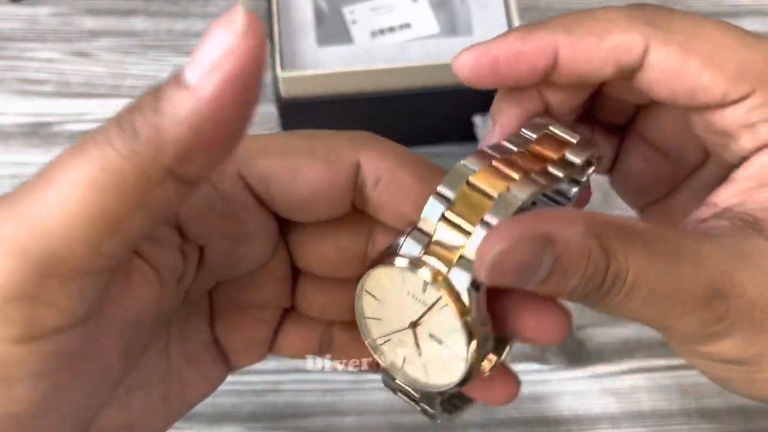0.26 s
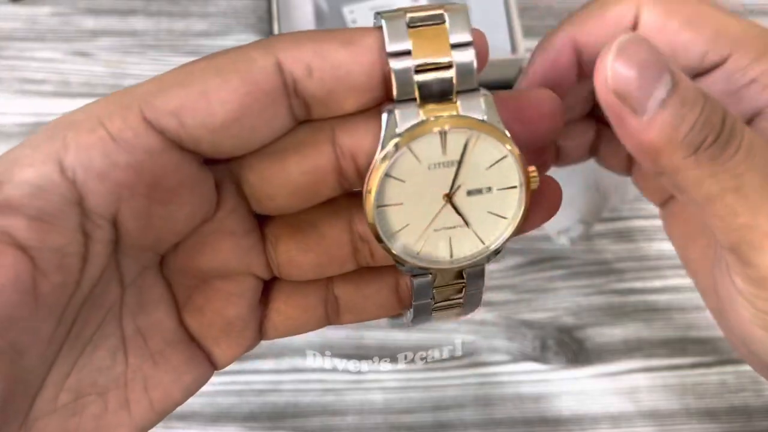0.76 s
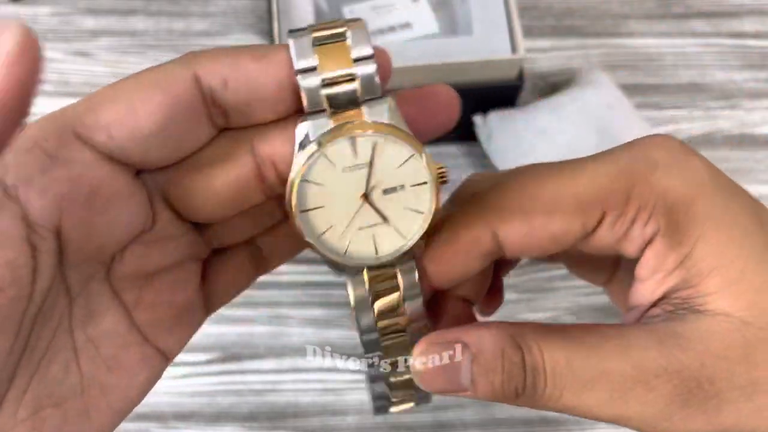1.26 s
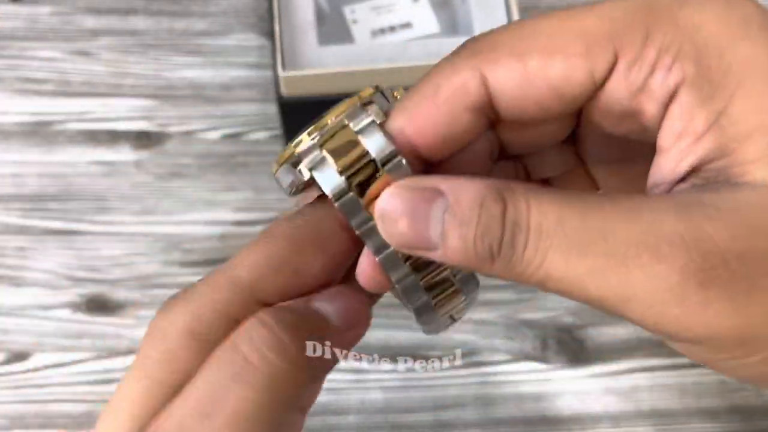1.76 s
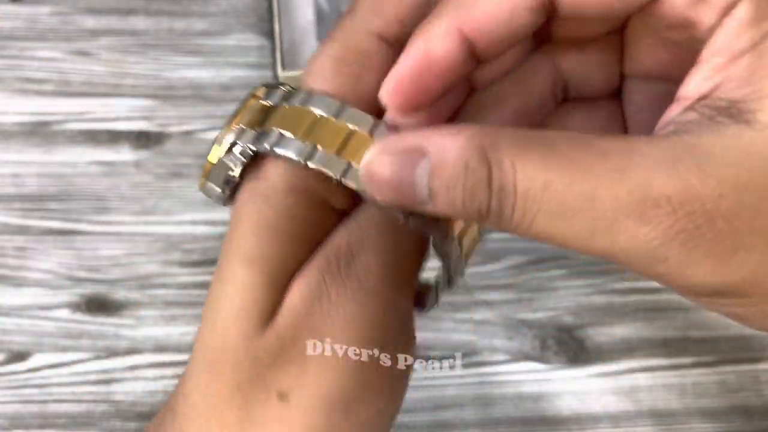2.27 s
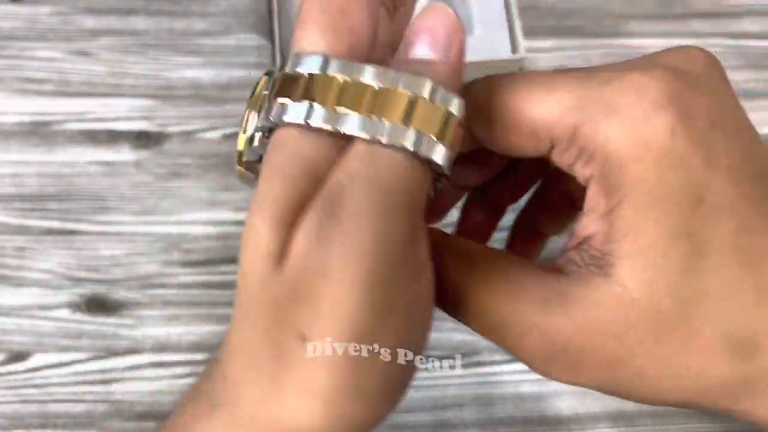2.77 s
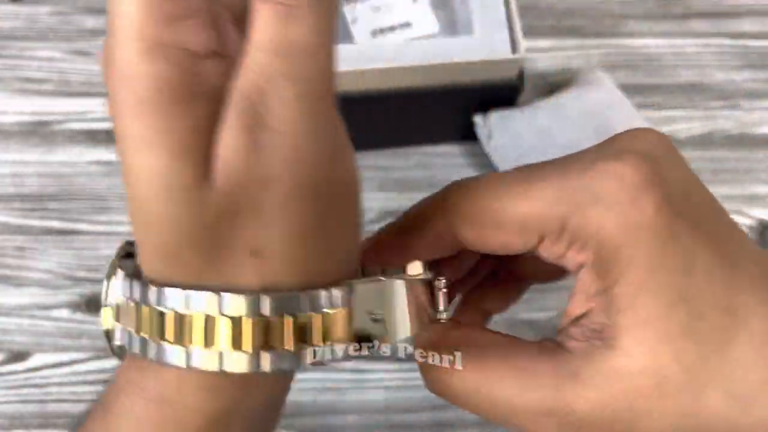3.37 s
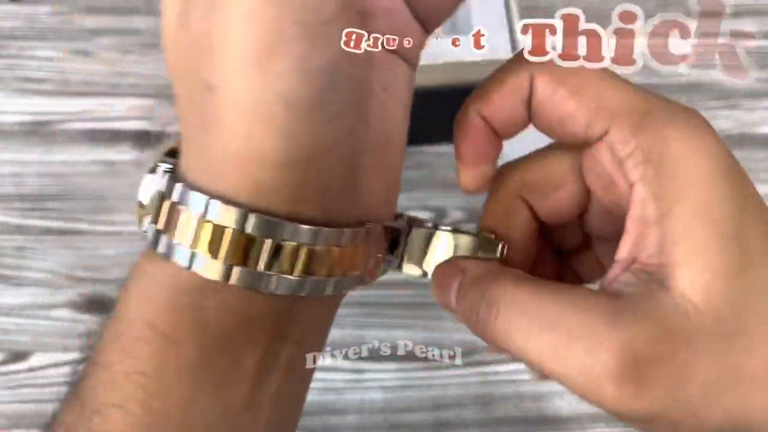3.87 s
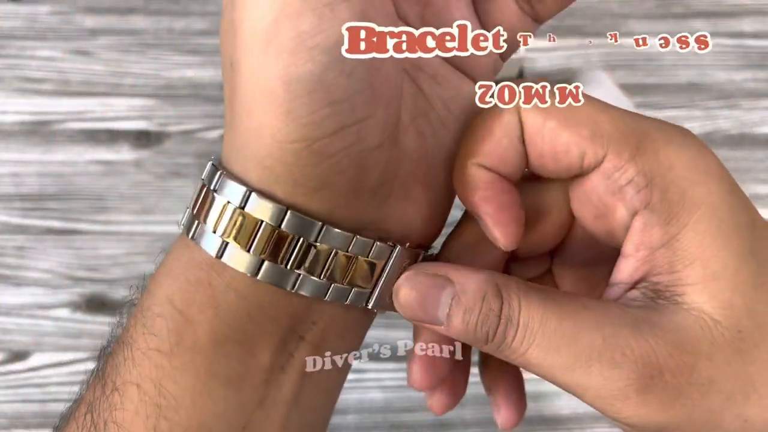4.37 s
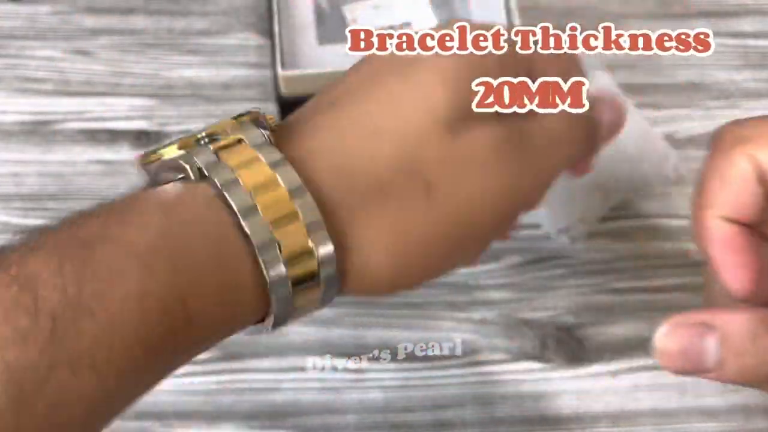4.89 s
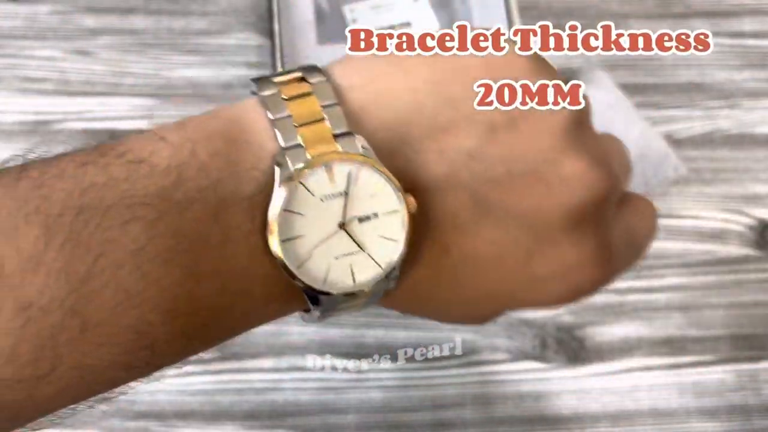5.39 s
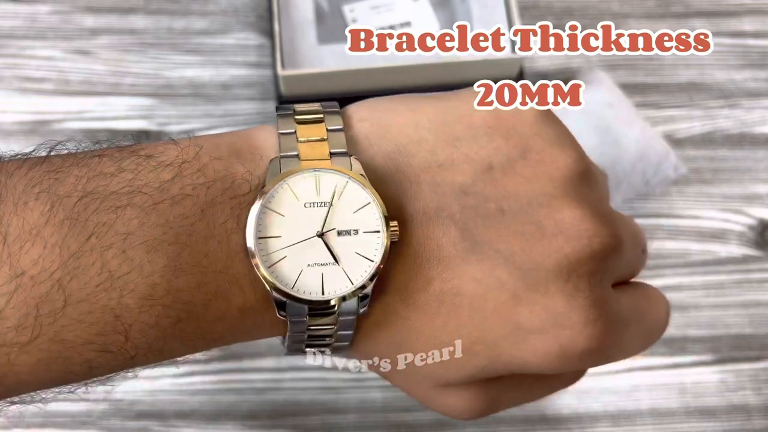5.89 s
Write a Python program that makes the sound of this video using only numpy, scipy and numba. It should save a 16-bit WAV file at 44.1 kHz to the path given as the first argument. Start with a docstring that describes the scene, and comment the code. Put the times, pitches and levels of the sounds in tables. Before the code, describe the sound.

Metal watch bracelet links clink and rattle up close as it is slipped over a hand, then the clasp snaps shut over a low indoor hum.

```python
"""Indoors, close on a phone's two microphone ports: a steel watch bracelet, over hum, rumble, hiss and a fan's whirr.
From the start its links clack and chatter as it is turned and slipped over a hand: tiny blows ring steel modes.
Around 1 to 1.5 s the moving hand puffs air on the ports, as decaying tones; skin and cloth brush, as low noise.
From 3.4 s the clasp plates tick, and at 4.05 and 4.42 s the clasp snaps hard: single blows on the same modes.
At 5.5 s something dull falls further off, as fading noise. Gain dips around the loudest peaks and creeps back."""
import sys
import numpy as np
from scipy import signal
from scipy.fft import rfft, irfft, next_fast_len
from scipy.io import wavfile
from scipy.ndimage import uniform_filter1d, minimum_filter1d
from numba import njit

SR = 44100
rng = np.random.default_rng(int(sys.argv[2]) if len(sys.argv) > 2 else 0)


def digitize_waveform(pressure):
    """Quantize a signal to 16-bit integers and store it at the path in sys.argv[1].

    Rows of a 2-D input are taken as channels; values are limited to [-1, 1].
    """
    field = np.atleast_2d(pressure).T
    bounded = np.clip(field, -1, 1)
    quanta = np.round(bounded * 32767).astype(np.int16)
    wavfile.write(sys.argv[1], SR, quanta)


N = 270774

# Room air, rumble to hiss: f/Hz, relative level/dB (per Hz)
AIR_SPECTRUM = [(18, -22), (28, -17.5), (52, 7), (75, -0.5), (100, -6), (150, -9), (210, -19), (330, -30.5),
                (500, -38), (900, -42.5), (1700, -47), (3000, -49), (8000, -54.5), (14000, -67)]
# Fan whirr: f/Hz, width of each filter pass/Hz, level/dB, left minus right/dB
WHIRR_BANDS = [(1235, 357, -67.5, 20.5), (2190, 480, -68.5, 20)]
# Skin and cloth brushing, a soft low rustle: start t/s, end t/s, relative level/dB
BRUSHES = [(0, 0.27, -59.5), (1.3, 1.33, -54), (3.2, 3.42, -52.5), (3.498, 3.925, -55)]
# Distant fall and its rebounds: t/s, relative level/dB, scuff against body/dB, fade to 1/e/ms
LANDINGS = [(5.535, -35, -17, 89), (5.572, -39.5, -7.5, 31), (5.593, -17, -35.5, 80),
            (5.62, -20.5, -36.5, 17), (5.69, -30.5, -47, 24), (5.72, -40, -14, 38), (5.809, -43, -44, 37)]
# Dull body of the fallen thing: f/Hz, width of each filter pass/Hz, relative level/dB
FALL_RESONANCES = [(219, 38, 0.5), (260.6, 36, -4), (352.6, 32, 0), (509, 87, -10.5), (610, 60, -15.5),
                   (713, 110, -15), (937.1, 250, -21), (1327.4, 880, -26)]
# Puffs of air from the moving hand on the ports: t/s, f/Hz, relative level/dB, 60 dB decay time/ms,
# left port lead/rad
AIR_PUFFS = [(1.024, 1120, -33, 35.84, 0.935), (1.375, 270, -12.5, 22, 2), (1.38, 105, -1, 38, 2),
             (1.428, 180, -18, 95, 1.95), (1.444, 71.4, -7, 190, 1.66), (1.48, 96.7, -11.5, 160, 0.99),
             (1.506, 109, -12.5, 170, 1.3)]
# What links and clasp ring with: f/Hz, relative level/dB, 60 dB ring time/ms
STEEL_MODES = [(1000, -4, 14), (1510, -1, 3.5), (1900, 3, 10), (2466, 3, 5.2), (3270, -4.5, 25),
               (3836, 9.5, 6.5), (4410, 7, 6.9), (4855, -8, 12), (5163, -12.5, 6.3), (5530, -5, 6.3),
               (6386, -5.5, 5.6), (6910, -8, 4), (7520, -11, 10), (8080, -2, 2.2), (8370, -5, 8.3),
               (8920, -6.5, 15), (9100, -9, 2.2), (9220, -2, 5.8), (9900, -0.5, 3), (10580, 5.5, 5.7),
               (11580, 10.5, 4.1), (12600, 5, 6), (12120, 3.5, 4), (13150, 11, 4.7), (14300, -4, 4.5),
               (14860, 4, 5.2), (14800, 7.5, 6.8), (15230, -18.5, 3)]
# Shakes that set the links rattling: strongest t/s, relative level/dB, 20 dB swell/ms, 20 dB fade/ms,
# low modes/dB
BRACELET_SHAKES = [(0.09, -49.5, 64, 60, -9), (0.2, -53.5, 47, 61, -17), (0.455, -34.5, 33, 62, -15.5),
                   (0.53, -40.5, 45, 65, -16), (0.95, -45.5, 16, 30, -16), (1.13, -58.5, 290, 30, -13),
                   (1.3, -37.5, 81, 110, -11), (1.47, -50.5, 83, 77, -13.5), (1.62, -52.5, 90, 270, -10.5),
                   (1.68, -44.5, 140, 26, -13), (2.15, -39.5, 79, 157, -13), (2.44, -42, 103, 66, -13),
                   (2.81, -51.5, 15, 330, -11.5), (2.87, -36.5, 35, 95, -16.5),
                   (3.19, -51, 180, 100, -15.5), (3.28, -49.5, 150, 89, -19), (3.44, -56, 14, 45, -15),
                   (3.55, -57, 77.8, 210, -19), (3.7, -63, 200, 45, -2.5), (3.92, -52, 130, 45, -16),
                   (3.98, -52.5, 61, 15, -12), (4.05, -50, 94, 87, -9), (4.1, -55, 39, 30, -10),
                   (4.425, -38.5, 9.5, 220, -20.5), (4.75, -51, 31, 61, -21.5), (4.96, -45.5, 26, 50, -31),
                   (5.07, -51, 50, 220, -22)]
# Links knocking: t/s, relative level/dB, low modes/dB, high modes/dB
LINK_CLACKS = [(0.052, -37, -8, -10), (0.0747, -27.5, -25, -26), (0.162, -38.5, -10, -25),
               (0.1754, -33.5, -15, -12), (0.186, -28.5, -20, 1.5), (0.2169, -34, -27, -8),
               (0.2886, -35, -13, -2.5), (0.3406, -51, -16, -6), (0.3625, -51, -14, -3),
               (0.4253, -34, -24, 0), (0.447, -36, -26, 1), (0.4598, -20.5, -35, -3.5),
               (0.4765, -29, -16, -5), (0.5212, -21.5, -20, 0), (0.5594, -43, -11, 4),
               (0.672, -42, -25, -0.5), (0.9452, -40, -27, -3), (1.0164, -42, -28, -13),
               (1.0945, -21, -30, -23), (1.1338, -30, -20, -5), (1.2256, -34, -13, -21),
               (1.2674, -23.5, -26, -32), (1.285, -22.5, -29, -7), (1.3059, -10, -19.5, -11),
               (1.3205, -27, -14, 0.5), (1.3553, -27, -26, -8), (1.462, -32, -32, 0.5),
               (1.509, -37, -19, -25), (1.5189, -30, -36, -40), (1.5818, -33, -22, -31),
               (1.5948, -31, -23, -31), (1.6049, -18, -38, -20), (1.6164, -24.5, -16, -9),
               (1.6357, -22.5, -25, -7), (1.648, -29, -25, -9), (1.667, -29.5, -27, -8.5),
               (1.6758, -28, -22, -8), (1.926, -38, -26, -9), (2.1047, -38, -27, -6),
               (2.12, -17.5, -19, -24), (2.1259, -13, -21.5, -14), (2.137, -21.5, -14, -13),
               (2.165, -19.5, -18.5, -7.5), (2.236, -29, -24, -19), (2.2825, -33.5, -21, -14),
               (2.3458, -28, -22, -13), (2.368, -29, -21, -8), (2.388, -25.5, -39, -6),
               (2.4208, -24, -33, -13), (2.4265, -23, -22, -5.5), (2.4375, -14, -21.5, -4.5),
               (2.616, -43.5, -43, -7), (2.794, -32.5, -36, -20), (2.8409, -24, -43, -24),
               (2.8693, -17.5, -43, -5), (2.8994, -29, -25, -16), (3.0917, -30.5, -23, -29),
               (3.1738, -22.5, -31, -18), (3.1823, -26, -36, -10), (3.216, -30.5, -37, -21),
               (3.261, -34, -18, -15), (3.271, -31, -29, -10), (3.3386, -35.5, -18, -9),
               (4.0338, -29, -42, -17), (4.2667, -45, -27, -25), (4.6045, -27.5, -26.5, -15),
               (4.6584, -31.5, -37, -7), (4.6671, -27, -32, -4.5), (4.7474, -47, -17, -5),
               (4.93, -39.5, -33.5, -21), (4.9566, -26.5, -46, -15), (5.0003, -32.5, -35, -11),
               (5.0645, -38.5, -40, -5), (5.0994, -50, -26, -22), (5.1315, -35.5, -28, -21)]
# Clasp plates ticking as they are folded: t/s, relative level/dB, low modes/dB, high modes/dB
CLASP_TICKS = [(3.4364, -38, -25, -14), (3.5302, -32, -19, -6), (3.6573, -31.5, -23, -10),
               (3.696, -20, -25, -3.5), (3.7823, -28.5, -30, -7), (3.8291, -34, -20, -7.5),
               (3.9088, -37, -20, -2.5), (3.9709, -20.5, -20.5, -10), (4.0213, -37, -19.5, -10),
               (4.1063, -26, -26, -7)]
# Clasp snapping shut: t/s, relative level/dB, low modes/dB, high modes/dB
CLASP_SNAPS = [(4.0473, -16.5, -25, -3.5), (4.049, -15.5, -30, -1.5), (4.0744, -6, -31, -8),
               (4.0747, -18, -37.5, -2), (4.42, -2, -22.5, -10)]
# Room echo by band: f/Hz, width of each filter pass/Hz, 60 dB decay time/s, relative level/dB
ECHO_BANDS = [(5240, 5800, 0.36, -15), (12800, 9700, 0.16, -28)]

AIR_DB, AIR_ALIKE_HZ = -35, 302  # below about this pitch the ports hear the same air
BRUSH_SWELL_S, BRUSH_FADE_S = 0.07, 0.21  # time to change 20 dB
HUM_HZ, HUM_DB = 100.2, -30.5
HUM_LEFT_DB, HUM_LEFT_RAD = -4, -0.16  # left against right
FALL_SCUFF_HZ = 2740
LOW_BELOW_HZ, HIGH_ABOVE_HZ = 4550, 9300  # borders of the low and high steel modes
LOW_MODES_LEFT_DB, HIGH_MODES_LEFT_DB = 6.5, -3.5  # left minus right, added to each blow's own lean
LOW_LEFT_LAG_MS, LEFT_LAG_MS, LEFT_RAD = -0.14, 0.25, -1.3  # left port against right
RATTLE_PER_S, RATTLE_HIGH_DB = 1600, -12.5
CLACK_CHATTER_MS, TICK_CHATTER_MS = 1.7, 0.68  # time scale of the contacts in one knock
KNOCK_LEFT_DB, KNOCK_LEFT_SCATTER_DB = 3, 4.5
SPOT_DB = 3.5  # scatter of mode levels with the place struck
ECHO_BUILD_S = 0.022
LIMIT_DB, QUICK_S, SLOW_S = 1.5, 0.014, 0.33  # ceiling re full scale, envelope falls to 1/e
SLOW_SHARE = 0.93  # share of the cut, in dB, that creeps back slowly
TOP_HZ = 16300


def undb(db):
    """Amplitude factor of a level in dB."""
    return 10 ** (np.asarray(db) / 20)


def level(x, db):
    """Scale to an rms level in dB."""
    return x * undb(db) / np.sqrt(np.mean(x ** 2))


def ring(x, hz, t60_s, phase=0):
    """Let x excite one exponentially decaying mode."""
    r = np.exp(-np.log(1000) / (t60_s * SR))
    w = 2 * np.pi * hz / SR
    return signal.lfilter([np.sin(phase), r * np.sin(w - phase)], [1, -2 * r * np.cos(w), r * r], x)


def band(hz, width_hz, channels=2, size=N):
    """Noise passed twice through one resonance, rms 1."""
    peak = signal.iirpeak(hz, hz / width_hz, SR)
    noise = rng.standard_normal((channels, size))
    once = signal.lfilter(*peak, noise)
    return level(signal.lfilter(*peak, once), 0)


def walk(rate):
    """Random levels held 1 / rate s, then smoothed twice over that time."""
    k = int(SR / rate)
    steps = np.repeat(rng.standard_normal(N // k + 1), k)
    return uniform_filter1d(uniform_filter1d(steps, k), k)[:N]


def swell(t, start, end, db, rise_s, fall_s):
    """Power of one gesture: swells to its level, holds, fades; rise and fall span 20 dB."""
    before = np.maximum(start - t, 0) / rise_s
    after = np.maximum(t - end, 0) / fall_s
    return undb(2 * (db - 20 * before - 20 * after))


def air():
    """Rumble and hiss: shaped noise, alike at both ports in the bass and apart higher up."""
    size = next_fast_len(N)
    hz = np.maximum(np.fft.rfftfreq(size, 1 / SR), 1)
    f, db = np.transpose(AIR_SPECTRUM)
    shape = undb(np.interp(np.log(hz), np.log(f), db))
    mid, side = rfft(rng.standard_normal((2, size))) * shape
    apart = 0.93 * hz / np.hypot(hz, AIR_ALIKE_HZ)
    ports = irfft(np.array([mid + apart * side, mid - apart * side]), size)[:, :N]
    return level(ports, AIR_DB) * undb(1.5 * walk(3))


def whirr():
    """A fan's whirr: narrow noise bands, each wavering in level and leaning left."""
    out = np.zeros((2, N))
    for hz, width_hz, db, left_db in WHIRR_BANDS:
        lean_db = np.array([[left_db], [-left_db]]) / 2
        out += undb(db + 1.5 * walk(8) + lean_db) * band(hz, width_hz)
    return out


def hum():
    """A machine's hum at twice the mains rate: a sine wavering slightly in pitch and level."""
    phase = 2 * np.pi * np.cumsum(HUM_HZ + 0.66 * walk(5)) / SR
    left = undb(HUM_LEFT_DB / 2) * np.sin(phase + HUM_LEFT_RAD)
    right = undb(-HUM_LEFT_DB / 2) * np.sin(phase)
    return np.sqrt(2) * undb(HUM_DB + 1.72 * walk(3.345)) * np.array([left, right])


def fall():
    """Thuds smeared by distance: body and scuff noise, rising fast and fading at each landing."""
    start = int(LANDINGS[0][0] * SR)
    t = np.arange(start, N) / SR
    body = np.zeros((2, len(t)))
    for hz, width_hz, db in FALL_RESONANCES:
        shared = band(hz, width_hz, channels=1, size=len(t))
        apart = band(hz, width_hz, size=len(t))
        body += undb(db) * (shared + apart)
    body = level(body, 0)
    scuff = band(FALL_SCUFF_HZ, 2400.0, size=len(t))
    out = np.zeros((2, len(t)))
    for s, db, scuff_db, fade_ms in LANDINGS:
        rise = np.clip((t - s) / 0.0031, 0, 1)
        fade = np.exp(-np.maximum(t - s, 0) * 1000 / fade_ms)
        out += undb(db) * rise * fade * (body + undb(scuff_db) * scuff)
    return np.pad(out, ((0, 0), (start, 0)))


def air_puffs():
    """Puffs of air from the moving hand on the microphone ports, each port with its own phase."""
    out = np.zeros((2, N))
    size = SR // 4
    for s, hz, db, ms, left_rad in AIR_PUFFS:
        puff = np.hanning(int(0.7 * SR / hz))
        puff = np.pad(puff / puff.sum(), (0, size - len(puff)))
        both = np.array([ring(puff, hz, ms / 1000, left_rad), ring(puff, hz, ms / 1000)])
        start = int(s * SR)
        out[:, start:start + size] += undb(db) * both
    return out


def brush():
    """Skin and cloth brushing: low noise bands that swell, flutter and fade with each gesture."""
    t = np.arange(N) / SR
    power = sum(swell(t, *row, BRUSH_SWELL_S, BRUSH_FADE_S) for row in BRUSHES)
    loudness = np.sqrt(power) * undb(2.5 * walk(25))
    return loudness * (band(460.0, 130.0) + 1.1 * band(420.0, 800.0))


def rattle():
    """Blows of links shifting on their pins with every shake: dense random ticks, a few much stronger."""
    when, strength, side = rng.random((int(RATTLE_PER_S * N / SR), 3)).T
    s = when * (N - 100) / SR
    power = np.array([swell(s, at, at, db, rise / 1000, fade / 1000)
                      for at, db, rise, fade, _ in BRACELET_SHAKES])
    low_db = np.array(BRACELET_SHAKES)[power.argmax(axis=0), -1]  # from the strongest shake at that moment
    size = np.sqrt(power.sum(axis=0)) * undb(-3.0 * np.log(1.01 - strength))
    spot = rng.standard_normal((len(s), len(STEEL_MODES)))
    return s, size, low_db, np.full(len(s), RATTLE_HIGH_DB), 6 * (side - 0.5), spot


def knocks(table, chatter_ms, count=24):
    """Blows of each knock: a quick chatter of contacts that swells and dies away."""
    s, db, low_db, high_db = np.repeat(np.array(table, float), count, axis=0).T
    late = rng.gamma(2.2, size=(len(table), count))
    weight = np.sqrt(late) * undb(-4.0 * late)
    weight /= np.sqrt((weight ** 2).sum(axis=1, keepdims=True))
    # all contacts of one knock share a place and a lean, but each has its own signs
    place_db = SPOT_DB * rng.standard_normal((len(table), len(STEEL_MODES)))
    spot = np.repeat(undb(place_db), count, axis=0)
    spot = spot * rng.choice([-1, 1], size=spot.shape)
    lean = np.repeat(rng.standard_normal(len(table)), count)
    left_db = KNOCK_LEFT_DB + KNOCK_LEFT_SCATTER_DB * lean
    times = s + (late.ravel() - 0.8) * chatter_ms / 1000
    return times, undb(db) * weight.ravel(), low_db, high_db, left_db, spot


def steel(s, size, low_db, high_db, left_db, spot):
    """Tiny blows ring the steel modes; spot is how well each struck place wakes each mode."""
    out = np.zeros((2, N))
    right = np.round(s * SR).astype(int)
    for k, (hz, db, ms) in enumerate(STEEL_MODES):
        low, high = hz < LOW_BELOW_HZ, hz > HIGH_ABOVE_HZ
        gain = size * spot[:, k] * undb(db + low * low_db + high * high_db)
        lean = undb((left_db + low * LOW_MODES_LEFT_DB + high * HIGH_MODES_LEFT_DB) / 2)
        # the left port gets low modes a moment early, the others late and turned in phase
        lag_ms, turn = (LOW_LEFT_LAG_MS, 0) if low else (LEFT_LAG_MS, LEFT_RAD)
        left = np.maximum(right + round(lag_ms * SR / 1000), 0)
        # the tiny offset keeps the filters clear of very slow arithmetic
        out[0] += ring(np.bincount(left, gain * lean, N) + 1e-18, hz, ms / 1000, turn)
        out[1] += ring(np.bincount(right, gain / lean, N) + 1e-18, hz, ms / 1000)
    return out


def bracelet():
    """Link knocks, clasp ticks, single-blow snaps and rattle all strike the same steel."""
    blows = zip(knocks(LINK_CLACKS, CLACK_CHATTER_MS), knocks(CLASP_TICKS, TICK_CHATTER_MS),
                knocks(CLASP_SNAPS, 0, count=1), rattle())
    return steel(*map(np.concatenate, blows))


def room(x):
    """Diffuse echo of the right port's sound: builds, dies sooner in the treble, differs at each port."""
    t = np.arange(SR // 2) / SR
    build = np.minimum(t / ECHO_BUILD_S, 1)
    tail = np.zeros((2, len(t)))
    for hz, width_hz, t60_s, db in ECHO_BANDS:
        decay = np.exp(-np.log(1000) * t / t60_s)
        tail += level(band(hz, width_hz, size=len(t)) * build * decay, db)
    return signal.oaconvolve(x[1:], tail / np.sqrt(len(t)), axes=1)[:, :N]


def scene():
    """The bracelet close by with its echo, over everything else at the two ports."""
    background = air() + whirr() + hum()
    watch = bracelet()
    return background + fall() + air_puffs() + brush() + watch + room(watch)


@njit
def follow(peak, release):
    """Envelope that jumps up at once and sinks slowly."""
    e, out = 0., np.empty(len(peak))
    for i in range(len(peak)):
        e = max(peak[i], e * release)
        out[i] = e
    return out


def limit_gain(peak, release_s):
    """Gain that holds the followed peaks at the limit."""
    return np.minimum(1, undb(LIMIT_DB) / follow(peak, np.exp(-1 / (release_s * SR))))


def record(dry):
    """Gain drops just ahead of any peak over the limit, returns part way quickly, then creeps; top is cut."""
    peak = -minimum_filter1d(-np.abs(dry).max(axis=0), size=65)
    quick, slow = limit_gain(peak, QUICK_S), limit_gain(peak, SLOW_S)
    gain = uniform_filter1d(np.minimum(quick, slow ** SLOW_SHARE), size=33)
    top_cut = signal.ellip(12, 0.2, 60, TOP_HZ, fs=SR, output="sos")
    return np.clip(signal.sosfilt(top_cut, dry * gain), -1, 1)


dry = scene()
out = record(dry)
digitize_waveform(out)
```